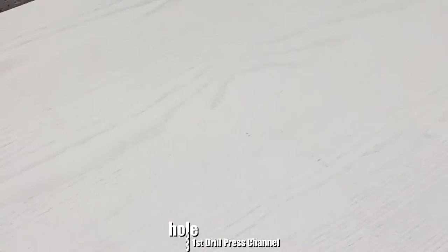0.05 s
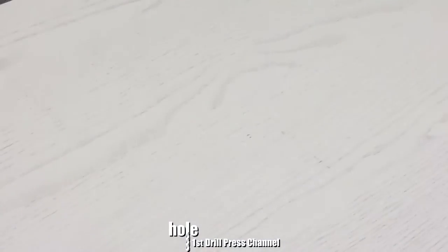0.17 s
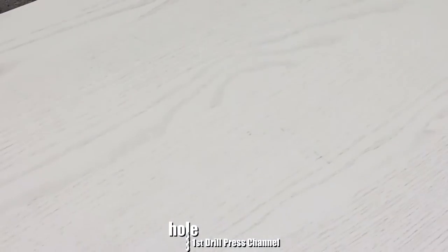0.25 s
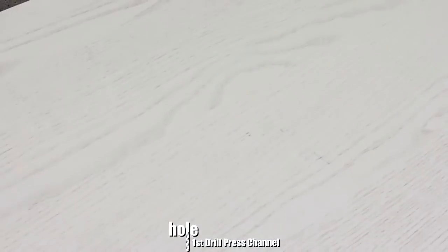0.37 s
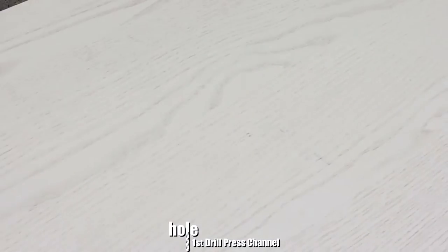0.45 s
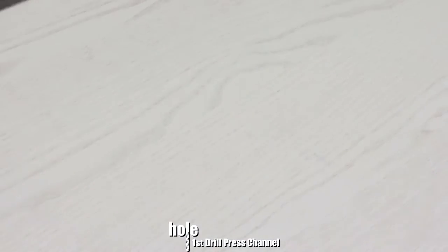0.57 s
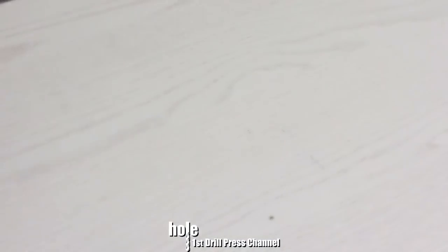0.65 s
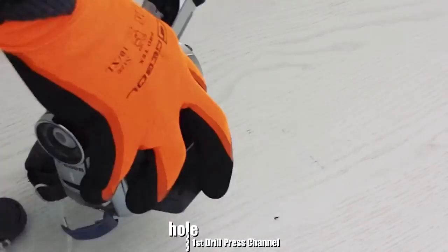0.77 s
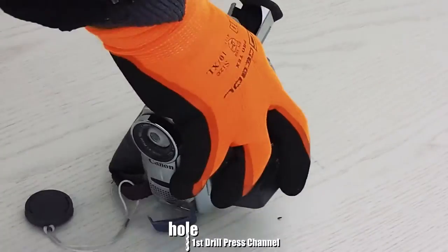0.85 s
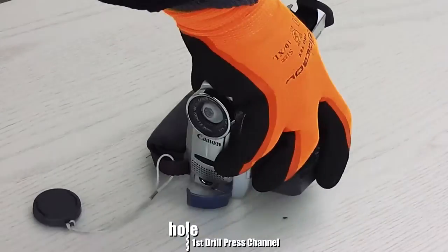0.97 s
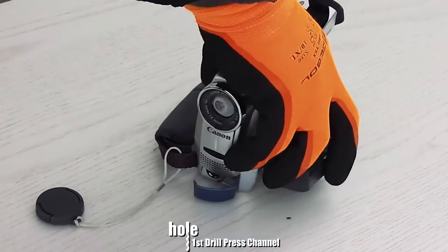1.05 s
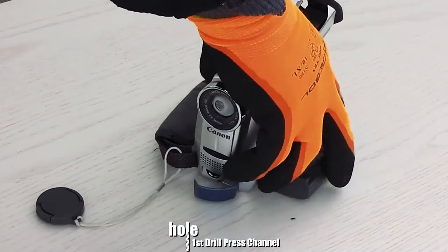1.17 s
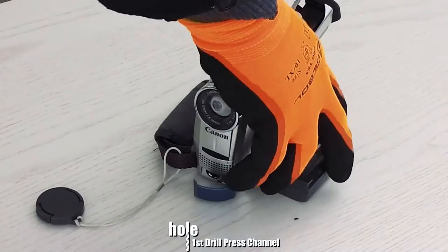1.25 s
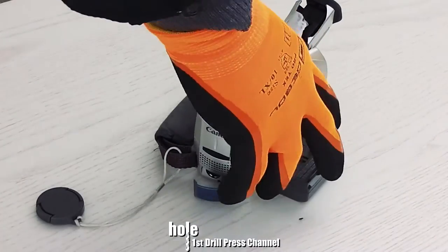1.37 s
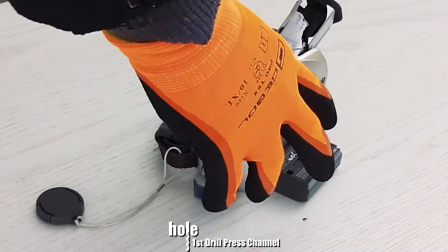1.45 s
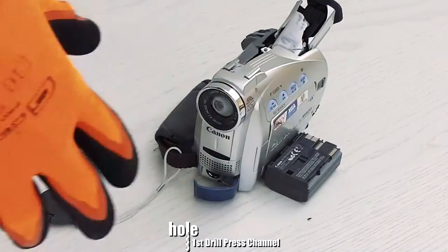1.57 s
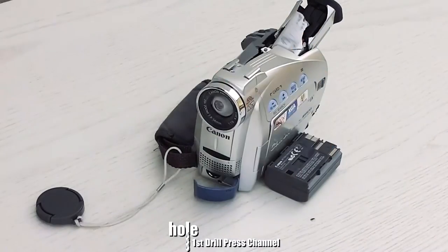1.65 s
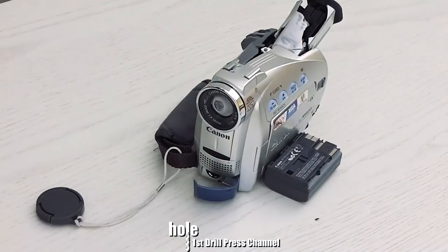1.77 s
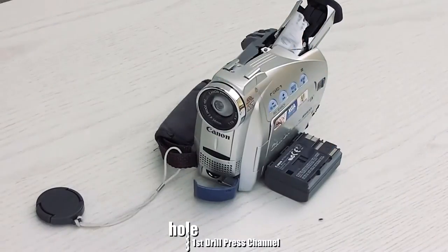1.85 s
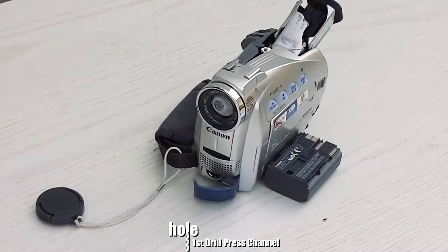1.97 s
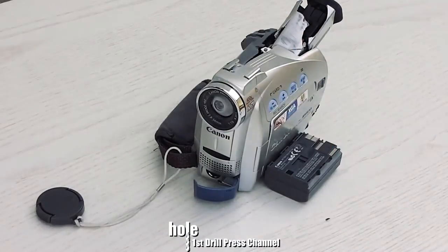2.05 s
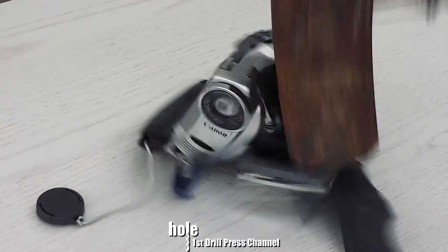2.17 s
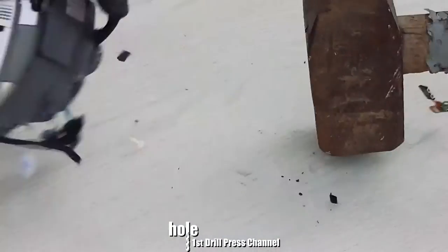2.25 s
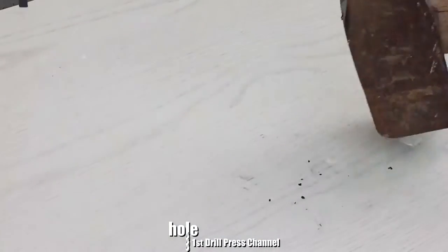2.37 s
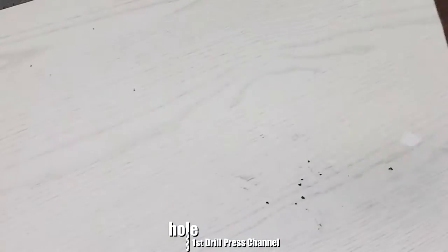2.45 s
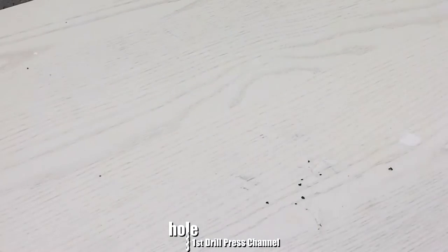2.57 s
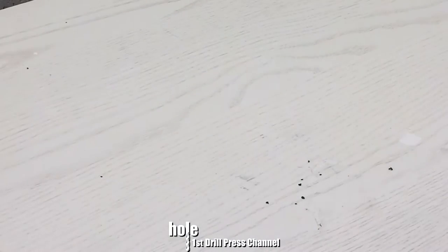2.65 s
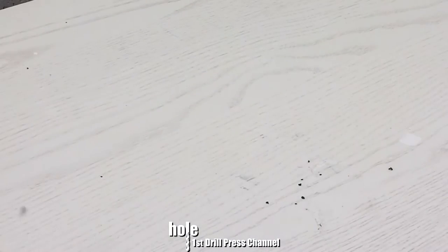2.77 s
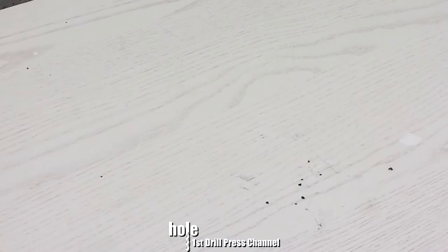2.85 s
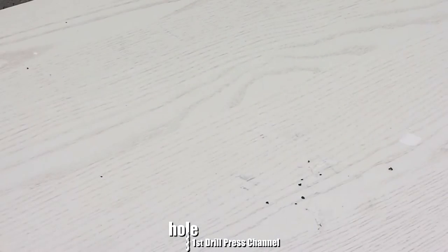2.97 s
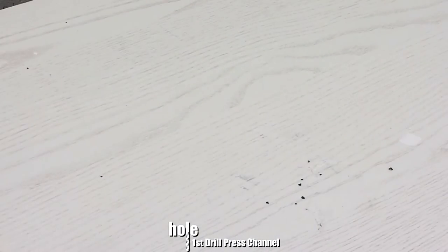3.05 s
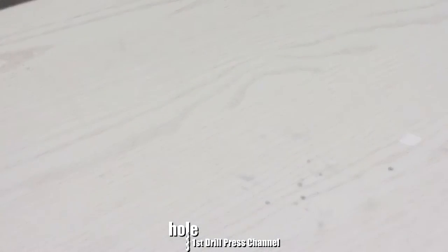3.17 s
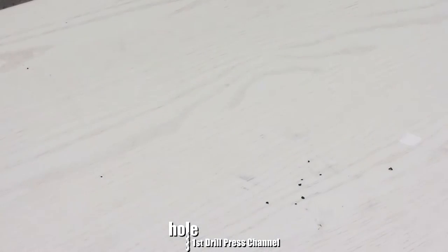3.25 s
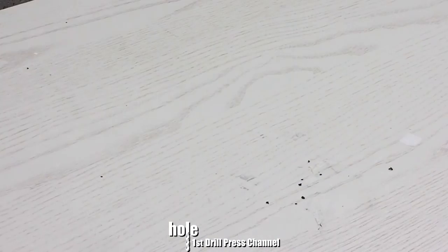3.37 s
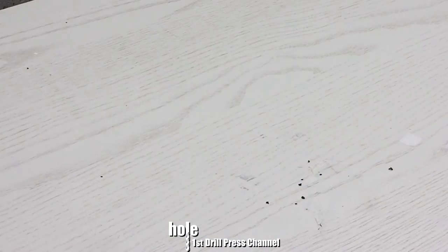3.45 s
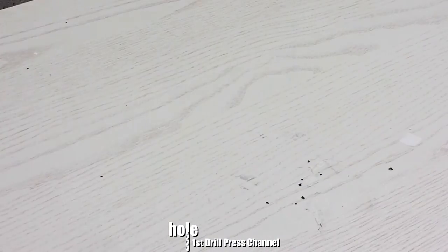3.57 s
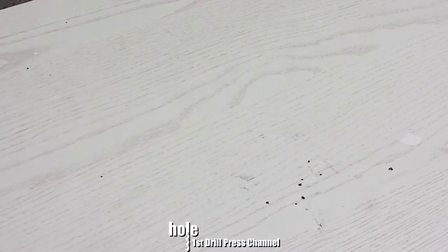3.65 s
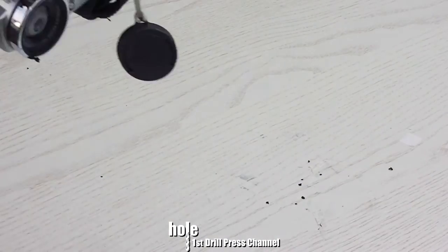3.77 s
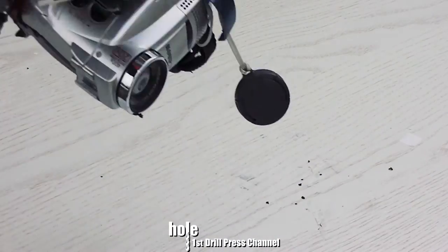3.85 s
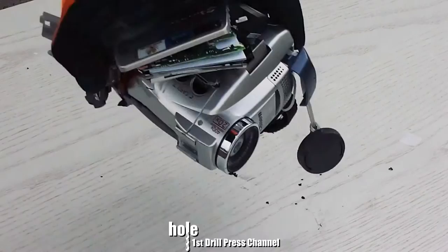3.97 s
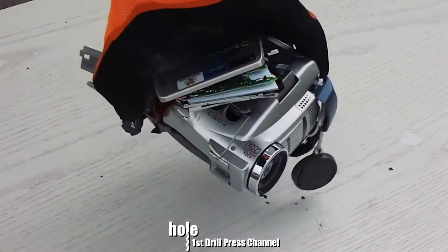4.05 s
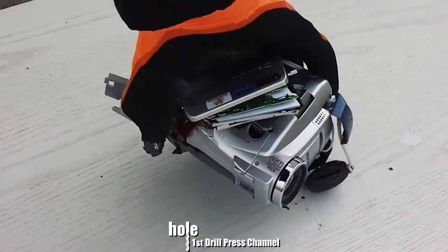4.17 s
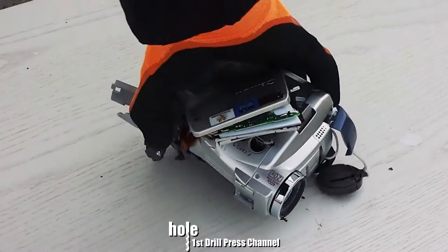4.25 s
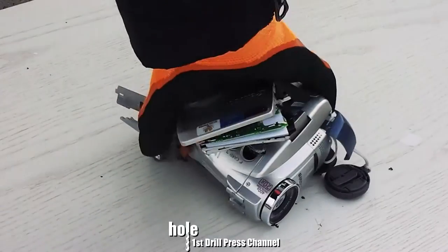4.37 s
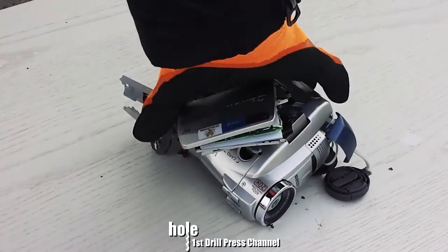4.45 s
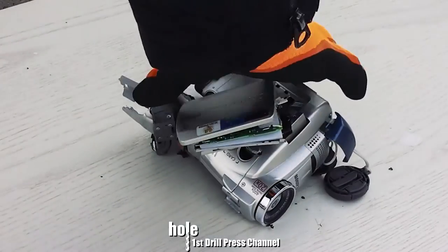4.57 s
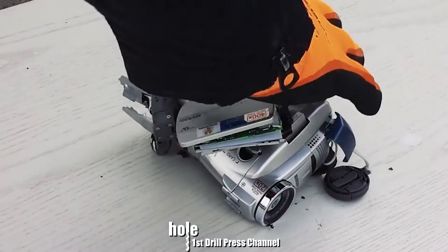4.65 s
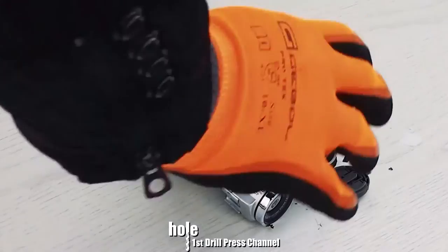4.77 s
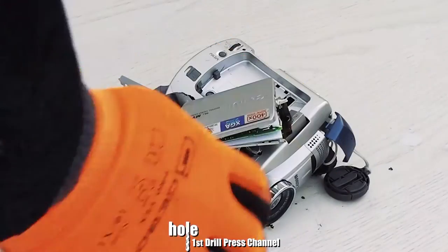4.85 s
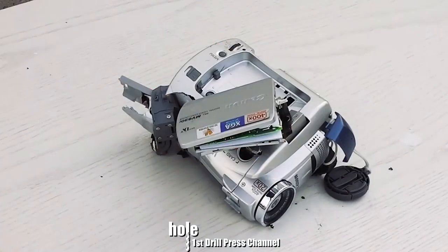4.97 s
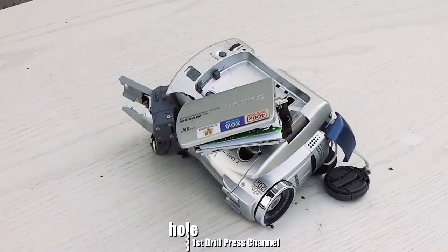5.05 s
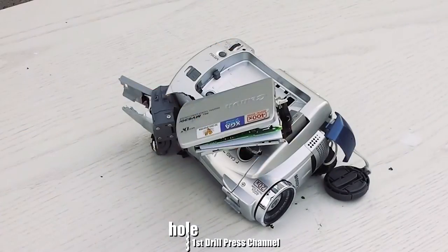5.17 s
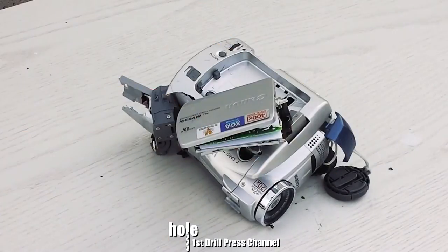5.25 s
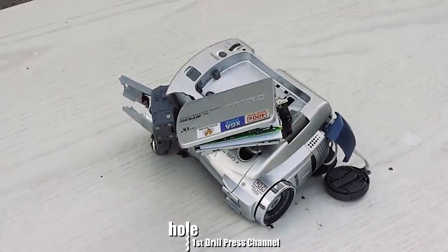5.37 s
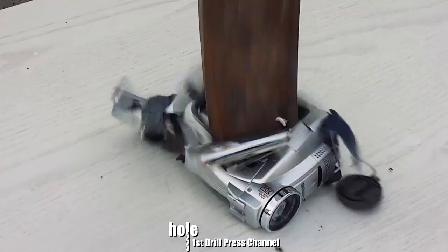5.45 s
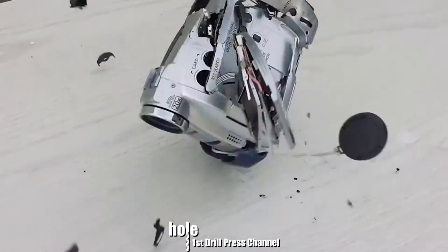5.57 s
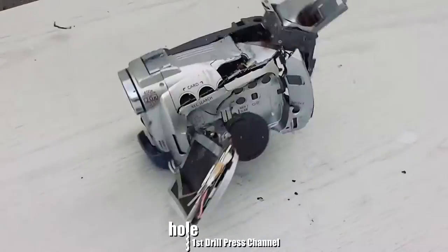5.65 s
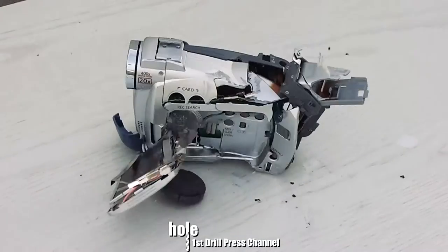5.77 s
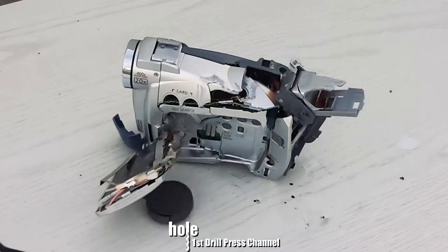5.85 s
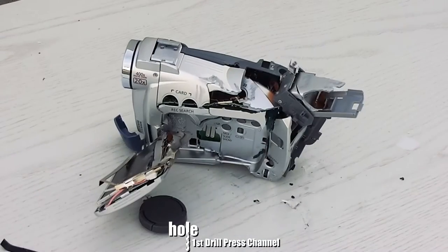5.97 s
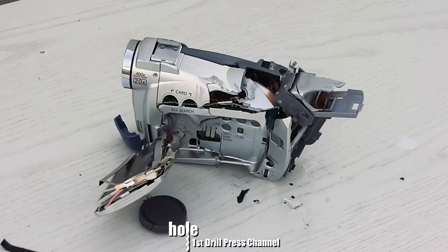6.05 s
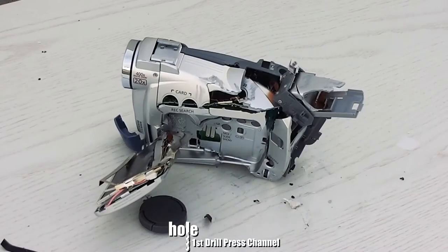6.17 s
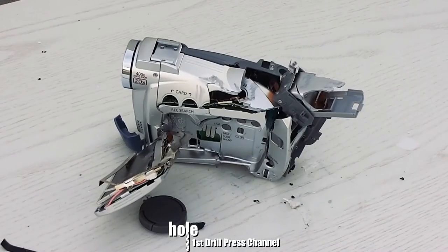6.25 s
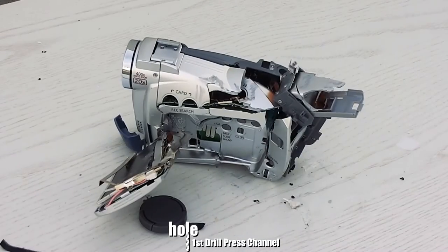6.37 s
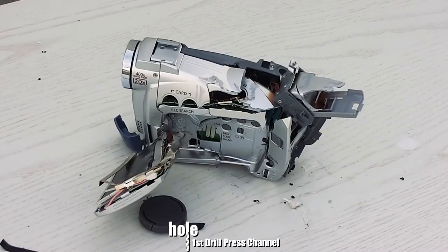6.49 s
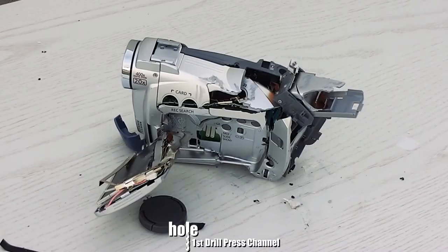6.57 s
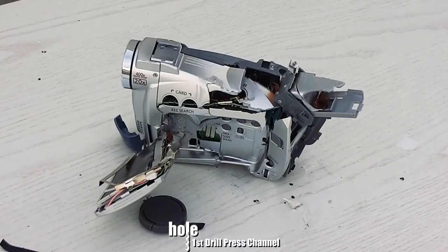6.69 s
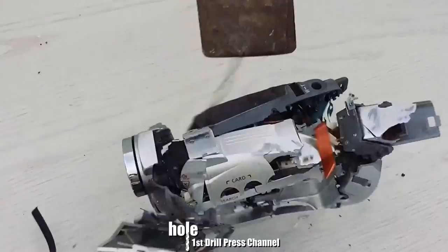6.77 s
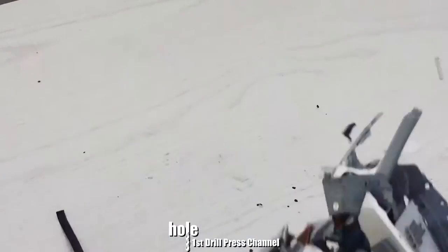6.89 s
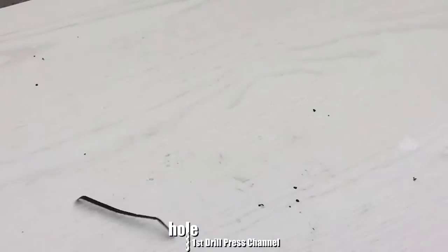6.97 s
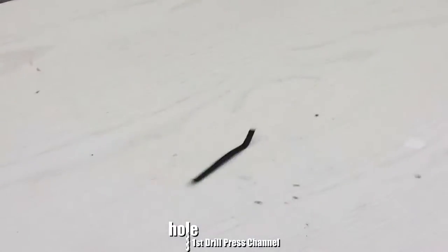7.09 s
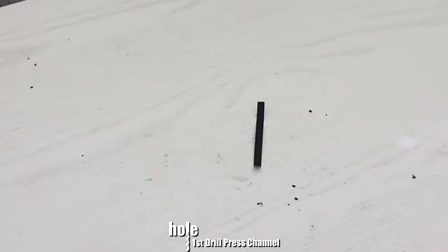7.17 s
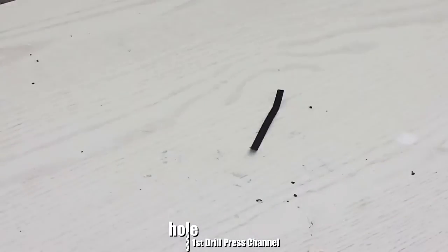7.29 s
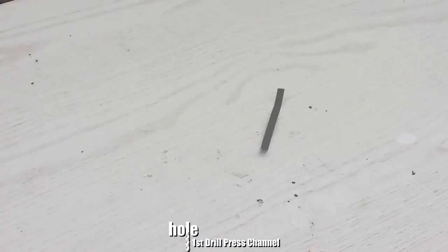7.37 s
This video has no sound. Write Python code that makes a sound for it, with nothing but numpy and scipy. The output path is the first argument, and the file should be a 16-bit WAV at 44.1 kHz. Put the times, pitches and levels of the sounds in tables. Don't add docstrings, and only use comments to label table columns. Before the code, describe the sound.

Close hard knocks and clicks of a camcorder on a board, three crunching hammer smashes, skittering plastic splinters, and late wind buffeting outdoors.

```python
import sys
import numpy as np
from scipy import signal
from scipy.fft import rfft, irfft
from scipy.io import wavfile
from scipy.ndimage import uniform_filter1d, map_coordinates

SR = 44100
rng = np.random.default_rng(int(sys.argv[2]) if len(sys.argv) > 2 else 0)


def master_out(mix):
    frames = np.transpose(np.atleast_2d(mix))
    ceiling = np.clip(frames, -1, 1)
    pcm = np.round(ceiling * 32767).astype(np.int16)
    wavfile.write(sys.argv[1], SR, pcm)


def invert_db(x):
    u = np.asarray(x, float) / 20
    return 10 ** u


N = 327222
SPAN = 8192
HZ = np.fft.rfftfreq(SPAN, 1 / SR)


def unit(x):
    return x / np.sqrt(np.mean(x ** 2) + 1e-20)


def along(points, hz):
    f, v = np.transpose(points)
    return np.interp(np.log(hz + 1), np.log(f + 1), v)


def curve(rows):
    s, value = np.transpose(rows)
    return np.interp(np.arange(N) / SR, s, value)


def wobble(rate):
    knots = rng.standard_normal(int(N * rate / SR) + 4)
    return map_coordinates(knots, [np.arange(N) * rate / SR])


def mix(*levels_db):
    return 10 * np.log10(sum(invert_db(2 * db) for db in levels_db))


def swells(rows, rise, fall):
    t = np.arange(0, N, 32) / SR
    s, db, hold = np.transpose(rows)[:, :, None]
    before = np.maximum(s - t, 0)
    after = np.maximum(t - s - hold, 0)
    power = invert_db(2 * (db - rise * before - fall * after)).sum(axis=0)
    return np.interp(np.arange(N) / SR, t, 10 * np.log10(power + 1e-12))


def resonances(peaks, f):
    total = 0
    for k, (centre, width, db) in enumerate(peaks):
        total = total + (-1) ** k * invert_db(db) * 1j * f * width / (centre ** 2 - f ** 2 + 1j * f * width)
    return total


def modes(rows):
    return resonances([(hz, np.log(1000) / np.pi / t60, db) for hz, db, t60 in rows], HZ)


def chips(centre_hz, spread, width, count):
    hz = centre_hz * np.exp(spread * rng.standard_normal(count))
    return resonances([(f, width * f, 0) for f in hz], HZ)


def dull(top_hz):
    return 1 / (1 + 1j * HZ / top_hz) ** 2


def add(out, s, db, response, t60, crush=0, rise=0.00029, pan_db=0, wide=0.76, rough_db=4, snap=0):
    t = np.arange(SPAN) / SR
    grains = invert_db(rough_db * unit(uniform_filter1d(rng.standard_normal(SPAN), size=40)))
    force = grains * (1 - np.exp(-t / rise)) * invert_db(-60 * np.maximum(t - crush, 0) / max(t60, .004))
    push = rng.standard_normal((2, SPAN)) * force
    push[0] += snap * np.exp(-t / rise)
    mid, side = irfft(rfft(push) * response, SPAN) * (t < .16)
    pair = np.array([mid + wide * side, mid - wide * side]) * invert_db([[pan_db / 2], [-pan_db / 2]])
    out[:, round(s * SR):][:, :SPAN] += invert_db(db) * pair / np.abs(mid).max()


# (frequency [Hz], correlation)
ALIKE = [(60, 0.93), (240, 0.98), (950, 0.86), (3770, 0.44), (15000, 0.019)]


def rush(spectrum, patchy_db, alike=ALIKE):
    z = signal.stft(rng.standard_normal((2, N)), nperseg=512)[2]
    field = uniform_filter1d(rng.standard_normal(z.shape[1:]), size=6, axis=0)
    field = uniform_filter1d(field, size=10, axis=1)
    pair = signal.istft(z * invert_db(patchy_db * unit(field)), nperseg=512)[1][:, :N]
    hz = np.fft.rfftfreq(N, 1 / SR)
    turn = np.arccos(np.clip(along(alike, hz), -1, 1)) / 2
    mid, side = irfft(rfft(pair) * invert_db(along(spectrum, hz)) * [np.cos(turn), np.sin(turn)], N)
    return unit(np.array([mid + side, mid - side]))


# (time [s], peak level [dB], ring [Hz], t60 [s])
THUDS = [(0.015, -28.5, 356, 0.32), (0.045, -25.5, 200, 0.16), (0.142, -18.5, 257, 0.22),
         (0.214, -26.5, 214, 0.065), (0.267, -20, 390, 0.13), (0.357, -22, 195, 0.23),
         (0.4235, -21, 402, 0.11), (0.584, -33.5, 523, 0.091), (5.577, -36, 290, 0.062),
         (5.605, -41.5, 252, .1), (5.794, -32, 200, 0.069), (2.239, -25.5, 342, 0.21),
         (2.315, -32, 195, 0.06), (2.354, -23.5, 253, 0.33), (2.387, -24, 361, 0.15),
         (3.267, -35.5, 243, 0.063), (3.348, -36, 477, 0.03), (3.383, -38, 597, 0.067),
         (5.507, -27.5, 294, 0.21), (5.654, -34, 460, 0.21), (5.699, -34, 196, 0.23),
         (5.801, -28.5, 195, 0.18), (5.828, -29, 328, 0.22), (6.855, -35, 327, 0.068),
         (6.889, -31.5, 344, 0.21), (7.006, -30.5, 326, 0.35), (7.102, -32.5, 210, 0.43)]
# (frequency [Hz], width [Hz], level [dB])
BOARD = [(195, 15, 1.5), (281, 15, -4), (378, 35, -2.5), (580, 34, -1), (666, 13, -6), (786, 38.4, 3),
         (968, 95, -8), (1290, 51, -11.5)]


def board():
    out = np.zeros((2, N + SPAN))
    wood = resonances(BOARD, HZ)
    for s, db, ring_hz, t60 in THUDS:
        colour = 0.72 * wood + resonances([(ring_hz, 40, 1)], HZ)
        colour = colour * dull(2500) * (1 - dull(266))
        add(out, s, db, colour, 0.96 * t60, rise=0.00068, wide=0.081, rough_db=3.5, snap=1.84)
    return out[:, :N]


# (time [s], peak level [dB], ring [Hz], t60 [s])
KNOCKS = [(0.149, -29, 695, 0.047), (0.015, -44, 1120, 0.056), (.045, -41.5, 1110, 0.05),
          (0.217, -50, 1120, 0.026), (.359, -43, 980, 0.054), (0.425, -40.5, 926, 0.04),
          (0.267, -19, 786, 0.032), (0.59, -29.5, 796, 0.048), (2.349, -36, 800, 0.13),
          (2.374, -34.5, 754, 0.042), (2.624, -36.5, 1130, 0.084), (2.85, -41, 1300, 0.17),
          (3.138, -35.5, 1700, 0.13), (3.281, -40, 1245, 0.12), (3.352, -35, 675, 0.059),
          (3.719, -38, 1240, 0.012), (4.345, -39, 1234, 0.079), (4.373, -36.5, 1000, 0.085),
          (5.655, -43, 1086, 0.11), (5.697, -45, 1240, 0.044), (5.93, -50, 1300, 0.14),
          (7.148, -36, 1300, 0.026), (7.21, -50, 1690, 0.03), (7.232, -45, 1650, 0.03),
          (6.853, -43, 1300, 0.093), (5.744, -34, 863, 0.058), (6.818, -37, 1500, 0.013),
          (7.008, -31.5, 816, 0.048), (7.104, -32, 1042, 0.23), (7.186, -46, 1620, 0.066),
          (7.322, -37.5, 1190, 0.022)]
# (frequency [Hz], level
# [dB], t60 [s])
SHELL = [(484, -8, .13), (790, -3, .13), (1010, -9, .1), (1815, -17, .045), (2570, -18, .05)]
# (time [s], peak level [dB])
TICKS = [(3.785, -41), (4.017, -39.5), (4.052, -36.5), (4.089, -41), (4.867, -36.5), (5.373, -37.5),
         (5.389, -37), (5.441, -37)]


def shell():
    out = np.zeros((2, N + SPAN))
    fixed = modes(SHELL)
    for s, db, ring_hz, t60 in KNOCKS:
        colour = fixed + .7 * chips(1.3 * ring_hz, .3, .06, count=4)
        colour += resonances([(ring_hz, .07 * ring_hz, 2), (1.5 * ring_hz, 1500, -12)], HZ)
        colour *= dull(2.08 * ring_hz)
        add(out, s, db, colour, 1.33 * t60, rise=0.00061, wide=0.26, rough_db=5, snap=2.17)
    tick_hz = 1300
    for s, db in TICKS:
        add(out, s, db, chips(tick_hz, 0.17, 1.0, count=3) * dull(tick_hz), t60=0.15, snap=7.1)
    return out[:, :N]


# (time [s], rumble level [dB], hold [s])
ROLLS = [
    (0, -37, 0.012),
    (.15, -42.5, 0.37),
    (2.36, -43, 0.04),
    (3.31, -57.5, 0.39),
    (4.49, -50, 0.0043),
    (5.55, -46.5, 0.37),
    (6.79, -44, 0.33),
]


def trembling():
    return swells(ROLLS, rise=180, fall=165)


# (time [s], rustle level [dB], hold [s])
STIRS = [(.29, -63, 0.043), (.61, -57.5, 0.023), (.85, -65.5, 0.15), (1.64, -66.5, 0.05),
         (2.275, -55.5, 0.0079), (2.66, -59, 0.27), (2.97, -56.5, 0.034), (3.15, -48, 0.01),
         (3.39, -61.5, 0.17), (3.68, -55.5, 0.0025), (4.37, -62.5, 0.063), (5, -56, 0.028),
         (5.37, -62, 0.16), (5.9, -65, 0.11), (6.28, -59.5, 0.12), (7.17, -54, 0.25)]


def stirring():
    return swells(STIRS, rise=180, fall=200)


# (time [s], gain [dB])
GAIN = [(0, -6), (.5, -1), (.68, 4.5), (.84, 0), (1.3, -0.5), (2.1, 3.5), (2.46, 1.5), (2.58, -1.5),
        (2.9, -3.5), (3.3, 10.5), (4.2, 7), (5.49, 5), (5.6, 0), (6.04, -4.5), (6.7, 9), (6.95, 4.5),
        (7.42, 0.5)]


def ducked():
    return curve(GAIN) - .9 * np.maximum(trembling() + 58, 0)


def street_level():
    return mix(-67 + curve(GAIN), stirring() - 4, trembling() - 33)


# (frequency [Hz], density [dB per Hz])
DEEP = [(15, -24), (25, -11), (43, 20.5), (119, 19), (130, 4), (170, 7), (290, -120)]
HUM = [(76, -104), (130, 3.5), (220, 1), (360, 2), (712, -11), (791, -29), (900, -12.5), (1170, -73)]
TRAFFIC = [(410, -7.5), (700, -1.5), (1610, -5), (1780, -8.5), (2170, -14), (3000, -24.5), (3900, -17),
           (6600, -120)]


def street():
    gain_db = curve(GAIN)
    deep = invert_db(-73.5 + 1.47 * gain_db) * rush(DEEP, patchy_db=4.5)
    hum_db = mix(-64.5 + .5 * gain_db, trembling()) + 1.5 * wobble(14)
    hum = invert_db(hum_db) * rush(HUM, patchy_db=1.5)
    traffic = invert_db(street_level() + 1.2 * wobble(60)) * rush(TRAFFIC, patchy_db=.6)
    return deep + hum + traffic


# (frequency [Hz], density [dB per Hz])
MIC = [(3000, -13), (9000, 2), (15900, 1)]


def preamp():
    return invert_db(-79 + .5 * ducked()) * rush(MIC, patchy_db=0.5)


def grit(level_db, quiet_db, centre_hz, count):
    when, pitch, life, size, side = rng.random((count, 5)).T
    start = (when * N).astype(int)
    hz = centre_hz * 4 ** (pitch - .5)
    t = np.arange(256) / SR
    loud = invert_db(level_db[start] + 12 * size ** 2) * (level_db[start] > quiet_db)
    decay = np.exp(-t * (hz / (1 + 3 * life))[:, None])
    ring = loud[:, None] * np.sin(2 * np.pi * hz[:, None] * t) * decay
    place = (start[:, None] + np.arange(256)).ravel()
    ears = (.5 + side, 1.5 - side)
    return np.array([np.bincount(place, (ring * ear[:, None]).ravel(), N + SPAN)[:N] for ear in ears])


# (frequency [Hz], density [dB per Hz])
RUSTLE = [(1470, -11), (2600, -13.5), (4410, -5.5), (8770, -7.5), (12500, -14.5), (15800, -27),
          (16500, -63)]


def rustle():
    stir_db, street_db = stirring(), street_level()
    level_db = mix(-75.5 + 1.41 * ducked(), stir_db)
    grain_db = np.clip(.25 * (stir_db + 66), .3, 4.5) * (wobble(45) + .6 * wobble(400))
    rubbing = invert_db(level_db - 1.5 + grain_db) * rush(RUSTLE, patchy_db=.6)
    crumbs = grit(stir_db, -58, 6900, count=3000)
    crumbs += grit(street_db + 1.5, -56.5, 1510, count=1200)
    crumbs += grit(stir_db + 5, -55, 6150, count=500)
    return rubbing + crumbs


# (time [s], peak level [dB], ring [Hz], t60 [s])
LEFT = [(1.8725, -43, 1900, 0.013), (2.3448, -41, 6900, 0.033), (2.5665, -45.5, 7300, 0.044),
        (2.6245, -22.5, 6950, 0.1), (2.833, -38.5, 7900, 0.13), (2.8643, -33, 4570, 0.068),
        (2.9208, -42, 6700, 0.028), (3.076, -30, 6550, 0.062), (3.1289, -35, 7000, 0.41),
        (3.1593, -28.5, 6900, 0.077), (3.255, -44, 7570, 0.091), (3.276, -25.5, 6100, 0.088),
        (3.5, -41, 7240, 0.045), (4.1544, -32, 6800, 0.021), (3.067, -34.5, 5040, 0.022)]
MIDDLE = [(0.7275, -29.5, 3270, 0.038), (0.7682, -28, 10200, 0.025), (0.8146, -30, 2880, 0.021),
          (0.8535, -32.5, 9800, 0.12), (0.8775, -38, 8450, 0.22), (1.0296, -54.5, 3600, 0.3),
          (1.1915, -28, 2910, 0.067), (2.1174, -38.5, 2120, 0.074), (2.5082, -45, 10800, 0.06),
          (2.7854, -34, 10300, 0.061), (4.1361, -27, 2920, 0.016), (4.2932, -44, 9400, 0.022),
          (4.3511, -34.5, 3760, 0.028), (4.3616, -30.5, 4800, 0.041), (4.4536, -38, 5440, 0.14),
          (5.655, -52.5, 3500, 0.051), (5.6971, -44, 3300, 0.16), (5.7455, -42.5, 3270, 0.16),
          (5.8143, -33, 7040, 0.054), (5.8907, -47, 3740, 0.033), (5.9361, -40.5, 6650, 0.052),
          (6.0827, -46.5, 4900, 0.032), (6.1576, -38, 10200, 0.0055), (6.2114, -36, 10700, 0.024),
          (6.2593, -37.5, 8900, 0.046), (6.3242, -36.5, 7860, 0.016), (6.8527, -29.5, 6840, 0.036),
          (6.932, -46.5, 8850, 0.022), (7.045, -48, 7000, 0.039), (7.1041, -24.5, 6200, 0.32)]
RIGHT = [(0.082, -49, 3800, 0.089), (0.2673, -35, 4000, 0.12), (0.3134, -36.5, 6500, 0.047),
         (0.4941, -43, 6740, 0.065), (0.5492, -35, 5130, 0.014), (0.5887, -32.5, 5900, 0.074),
         (0.601, -25, 7000, 0.056), (0.634, -32, 6960, 0.021), (2.5407, -47, 4970, 0.025),
         (2.9487, -36, 7100, 0.44), (3.3527, -36.5, 8100, 0.089), (3.3843, -33, 5740, 0.088),
         (3.6501, -40, 6130, 0.064), (3.6637, -31, 5600, 0.031), (6.8163, -31, 7450, 0.019),
         (7.0044, -37, 6340, 0.16), (7.1485, -32, 6100, 0.11), (7.1655, -24, 7200, 0.32),
         (7.187, -24, 4200, 0.055), (7.2094, -31, 7800, 0.11), (7.2718, -35, 7600, 0.05),
         (7.3192, -27, 7140, 0.043), (7.392, -34, 5200, 0.026)]
# (frequency [Hz], density [dB per Hz])
SPLINTER = [(1200, -9.5), (2500, -11.5), (4000, -5), (8000, -5.5), (12000, -7), (15800, -16.5),
            (16500, -62)]
# (frequency [Hz], level [dB], t60 [s])
WASHER = [(5600, 0, 0.1), (6850, 0, 0.1), (9450, 0, 0.04), (7900, -8, .06)]


def splinters():
    out = np.zeros((2, N + SPAN))
    for rows, pan_db in ((LEFT, 9.5), (MIDDLE, 0.3), (RIGHT, -6)):
        for s, db, ring_hz, t60 in rows:
            rings = resonances([(ring_hz, 0.12 * ring_hz, 6)], HZ)
            rings = rings + 1.14 * chips(ring_hz, 0.69, 0.17, count=3)
            colour = invert_db(along(SPLINTER, HZ)) * dull(2.4 * ring_hz) * (1 + rings)
            add(out, s, db, colour, .6 * t60, crush=.08 * t60, rise=.0002, pan_db=pan_db, wide=.3,
                rough_db=5, snap=2)
    add(out, 7.331, -41, modes(WASHER), .004, rise=.00002, wide=0.1, snap=60)
    return out[:, :N]


# (time [s], level [dB])
FAR = [(.45, -105), (.6, -66.5), (.96, -61.5), (1.24, -68), (1.85, -61), (2.11, -63.5), (2.2, -69),
       (2.35, -94)]
# (frequency [Hz], density [dB per Hz])
MACHINE = [(1200, -18), (2000, -10), (3300, -15.5), (4300, -29), (6000, -73)]


def machine():
    return invert_db(curve(FAR)) * rush(MACHINE, patchy_db=.6)


# (time [s], peak level [dB], ring [Hz], left over right [dB])
FLAKES = [(0.4945, -32, 6840, -6), (0.805, -43, 2410, 1), (0.8255, -30, 9200, 3), (0.889, -34, 8400, 0.5),
          (1.188, -31, 2780, 0.0), (1.815, -56, 2600, 7), (1.915, -50, 3060, 6), (1.936, -66, 2900, 1),
          (2.265, -36.5, 6500, 0), (2.4115, -49.5, 4140, 8), (2.47, -56, 5100, 1.5),
          (2.5202, -52, 10900, 0), (2.5424, -40, 9600, 5), (2.567, -35.5, 6670, 4), (2.6334, -40, 3450, 20),
          (2.64, -35, 4350, 13), (2.665, -42, 4490, 22), (2.7085, -40, 10800, -6),
          (2.7518, -44.5, 6850, 16), (2.7596, -49, 6100, 19), (2.826, -48, 7980, 4),
          (2.8648, -32, 4530, 16), (2.8743, -26, 4200, 13), (2.9766, -49, 4550, -6), (2.99, -46, 4820, -7),
          (3.0114, -43, 5000, -7), (3.0462, -42, 7160, 1), (3.1382, -35, 7100, 25), (3.1997, -38, 4400, 18),
          (3.2174, -40, 6500, 15), (3.24, -43, 7510, -16), (3.2634, -42, 6600, 15), (3.293, -34, 6470, 9),
          (3.377, -37.5, 4600, -4.0), (3.474, -46, 7100, 17), (3.5196, -47.5, 6150, 19),
          (3.619, -48, 3950, 7), (3.6254, -45, 4860, -5), (3.64, -48, 6090, -10), (3.6708, -39, 9900, -9),
          (3.677, -40, 5380, -3), (3.687, -45, 9960, -2.5), (3.694, -46, 7320, -10), (4.3181, -45, 3330, 1),
          (4.376, -35.5, 4400, 0.5), (4.434, -43, 3100, 1.0), (4.4754, -43, 3630, 3),
          (4.505, -51, 9820, 4.5), (5.349, -49, 5100, 12)]
DEBRIS = [(5.6633, -52.5, 4200, 1.0), (5.7024, -46.5, 3450, 0.5), (5.7154, -51, 3500, -0.5),
          (5.7508, -40.5, 5000, -2), (5.7832, -49, 4730, 2.5), (5.8038, -42, 4730, 0.5),
          (5.8298, -33.5, 12000, 2), (5.844, -45, 2740, 0), (5.881, -50, 3660, 0), (5.9285, -44, 6750, 1.0),
          (5.9524, -43, 4130, 0.5), (5.9733, -49, 4170, -3), (6.0113, -47.5, 3100, 1.0),
          (6.0901, -49, 7800, 0.5), (6.1328, -50, 7400, -0.5), (6.172, -46, 4670, 4),
          (6.1886, -50, 7040, -5), (6.2754, -47.5, 4140, -2.5), (6.3116, -44, 9200, 3),
          (6.8278, -28.5, 6730, -4), (6.8666, -41, 6010, 0.5), (6.914, -48, 4250, -8),
          (7.0194, -68, 7580, 0), (7.0405, -42, 7060, 1), (7.1045, -25.5, 5680, -1),
          (7.1277, -27, 6060, -3), (7.1495, -35, 11000, -2), (7.1723, -30, 3700, 2), (7.2105, -33, 9600, 2),
          (7.2304, -28.5, 6840, -2), (7.2514, -35, 6650, -5), (7.3035, -39, 6700, -9)]
# (frequency [Hz], density [dB per Hz])
FLAKE = [(500, -34), (1200, 9), (2500, -10), (4000, -7), (9000, -4.5), (13000, -11.5), (15800, -26),
         (16500, -62)]


def flakes():
    out = np.zeros((2, N + SPAN))
    for rows, t60 in ((FLAKES, .024), (DEBRIS, .028)):
        for s, db, ring_hz, pan_db in rows:
            rings = resonances([(ring_hz, .03 * ring_hz, 10)], HZ)
            rings = rings + resonances([(1.2 * ring_hz, ring_hz, -2)], HZ)
            colour = invert_db(along(FLAKE, HZ)) * (0.1 + rings) * dull(3 * ring_hz)
            add(out, s, db, colour, t60, crush=.0012, rise=.00005, pan_db=pan_db, wide=.35, snap=3)
    return out[:, :N]


# (time [s], peak level [dB], favoured pitch [Hz], force t60 [s])
TAPS = [(.727, -20.5, 2270, 0.028), (0.767, -43.5, 593, 0.012), (.770, -33, 2760, 0.02),
        (.815, -31, 2740, 0.064), (.855, -41, 2600, 0.051), (0.878, -37.5, 2000, 0.19),
        (.957, -29.5, 613, 0.0055), (1.031, -32, 1200, 0.019), (1.1915, -19, 1680, 0.077),
        (1.199, -27, 1240, 0.068)]
SETS = [
    (4.137, -22, 1300, 0.065),
    (4.140, -47, 524, 0.014),
    (4.4550, -29, 330, 0.013),
    (4.4553, -24.5, 890, 0.036),
    (4.466, -22.5, 470, 0.0087),
]
# (frequency [Hz], level [dB], t60 [s])
CASE = [(340, -3, .08), (484, 0, .13), (818, 1, .1), (1012, -8, .12), (1130, -6, .08), (1523, -5, .045),
        (1810, -5, .05), (2040, -6, .055), (2520, -4, .055), (2790, -8, .035), (3120, -5, .03)]
WRECK = [(242, 3, .2), (404, 1, .13), (571, 1, .17), (786, -4, .09), (910, -5, .065), (1280, -2, .065),
         (1626, -3, .07), (1868, -6, .05)]


def case():
    out = np.zeros((2, N + SPAN))
    for body, rows in ((CASE, TAPS), (WRECK, SETS)):
        fixed = modes(body)
        for s, db, favoured_hz, t60 in rows:
            near = resonances([(favoured_hz, .8 * favoured_hz, 0)], HZ)
            colour = (fixed + .22) * near * (1 - dull(.5 * favoured_hz))
            add(out, s, db, colour, t60, rise=.0003, wide=.15, snap=3)
    return out[:, :N]


# (time [s], peak level [dB], crush length [s], t60 [s], body level [dB])
BLOWS = [
    (2.2186, -14.5, 0.0089, 0.075, -20.5),
    (5.5, -18, 0.0073, 0.06, -25),
    (6.7522, -17.5, 0.0049, 0.076, -19.5),
]
# (frequency [Hz], density [dB per Hz])
CRUSH = [(100, -53), (233, -8), (477, -4.5), (681, -3.5), (1130, -4), (3500, -21.5), (7700, -120)]


def hammer():
    out = np.zeros((2, N + SPAN))
    for s, db, crush, t60, body_db in BLOWS:
        add(out, s, db - 2, invert_db(along(SPLINTER, HZ)), t60, crush, rise=.0002, wide=.3, rough_db=2)
        add(out, s, body_db + 4, invert_db(along(CRUSH, HZ)), 0.91 * t60, 2.3 * crush, wide=0.14, rough_db=5, snap=1.1)
    return out[:, :N]


# (start [s], end [s], level [dB])
SQUEAKS = [
    (3.472, 3.53, -67),
    (3.53, 3.615, -75),
]


def squeak():
    t = np.arange(N) / SR
    gate = sum(invert_db(db) * (t > start) * (t < end) for start, end, db in SQUEAKS)
    return gate * (1 + .3 * wobble(120)) * np.sin(2 * np.pi * 13300 * t)


# (time [s], buffet level [dB], hold [s])
PUFFS = [(3.62, -58, 0.014), (6, -47.5, 0.038), (6.18, -43, 0.09), (6.31, -44, .03), (6.37, -32, 0.04),
         (6.46, -29, 0.06), (6.56, -28, 0.07), (6.695, -24.5, 0.055), (7.1, -43, 0.15), (7.33, -32, 0.0041),
         (7.39, -28, 0.016)]
# (frequency [Hz], density [dB per Hz])
BUFFET = [(12, -60), (28, -28), (80, 5), (225, -3), (406, -19.5), (1980, -120)]


def wind():
    buffet_db = swells(PUFFS, rise=325, fall=790)
    puffs = rush(BUFFET, patchy_db=1.5, alike=[(30, -.85)])
    power = uniform_filter1d((puffs ** 2).mean(axis=0), size=1100)
    puffs /= np.sqrt(np.abs(power) + 0.15)
    return invert_db(buffet_db) * puffs * invert_db([[1.2], [-1.2]])


def scene():
    table = board() + shell() + splinters() + flakes() + case() + hammer()
    around = street() + preamp() + rustle() + machine() + squeak() + wind()
    return table + around


def low_pass(x):
    return signal.sosfilt(signal.butter(12, 16760, fs=SR, output="sos"), x)


def record(dry):
    held = dry / (1 + np.abs(dry / .2) ** 4) ** (1 / 4)
    return low_pass(held)


dry = scene()
out = record(dry)
master_out(out)
```